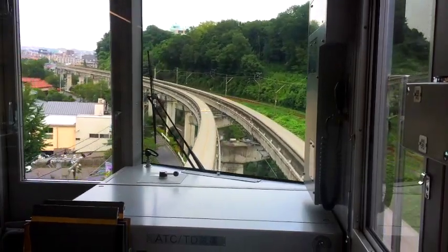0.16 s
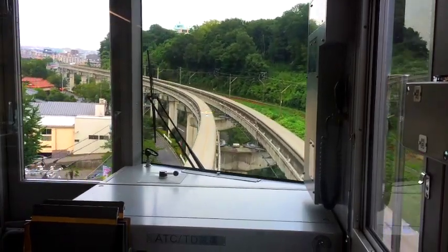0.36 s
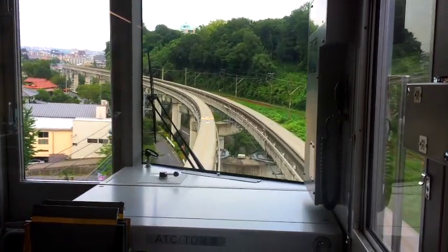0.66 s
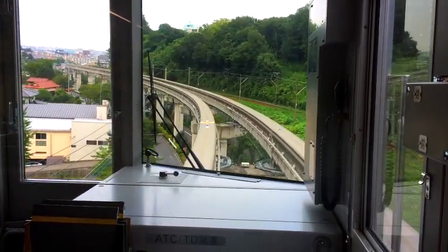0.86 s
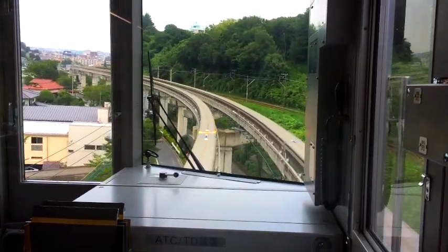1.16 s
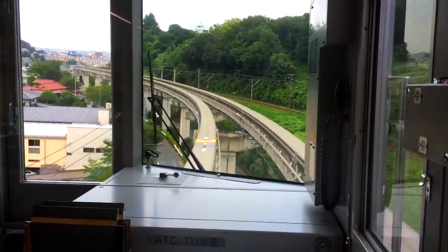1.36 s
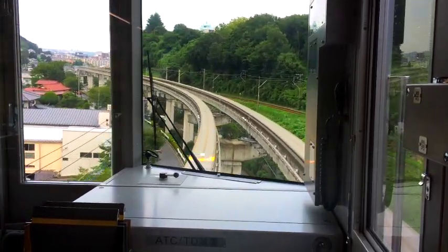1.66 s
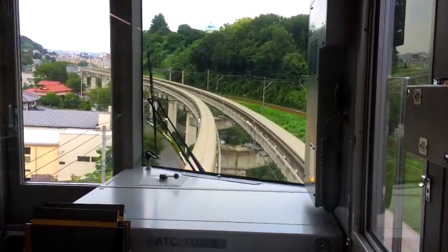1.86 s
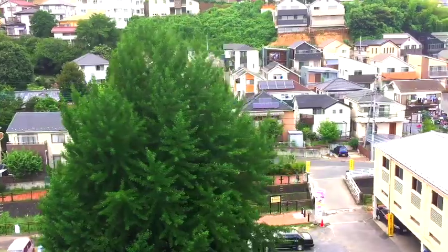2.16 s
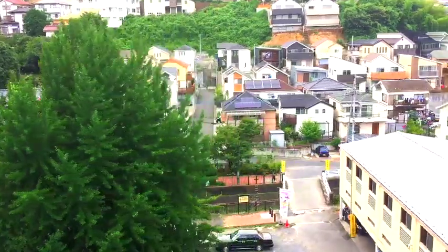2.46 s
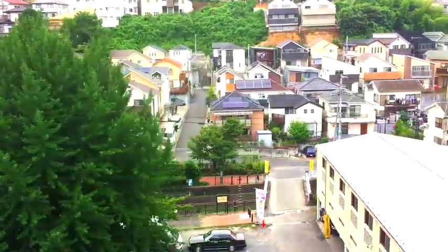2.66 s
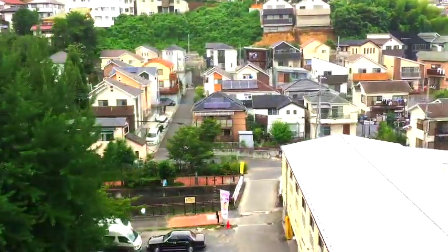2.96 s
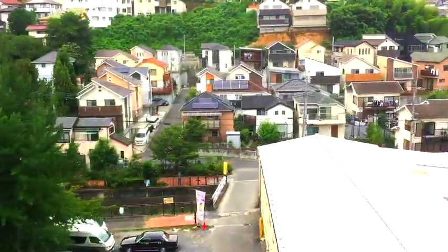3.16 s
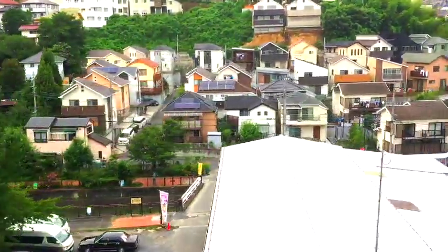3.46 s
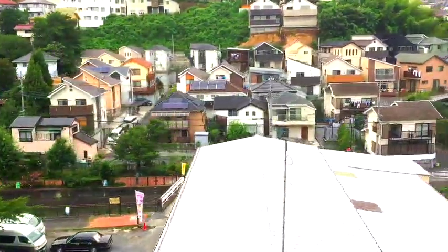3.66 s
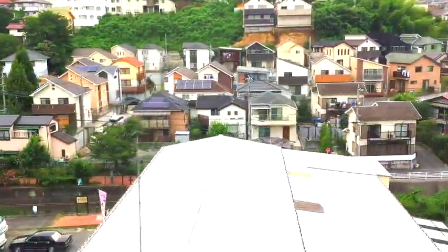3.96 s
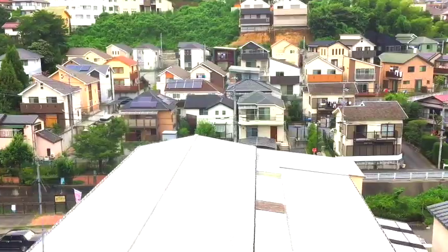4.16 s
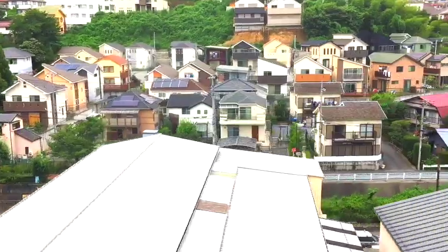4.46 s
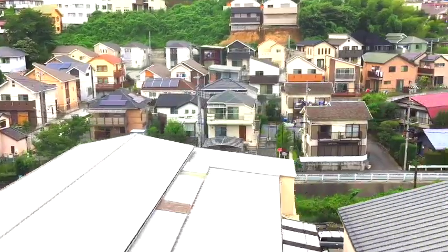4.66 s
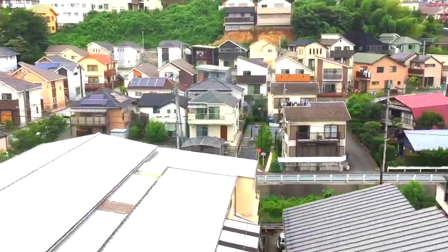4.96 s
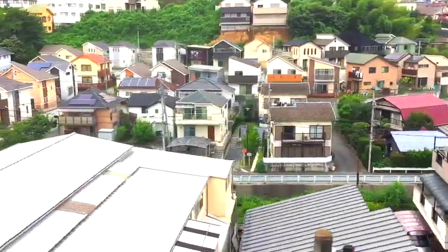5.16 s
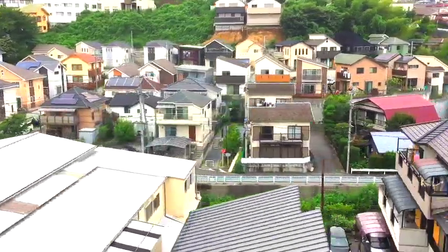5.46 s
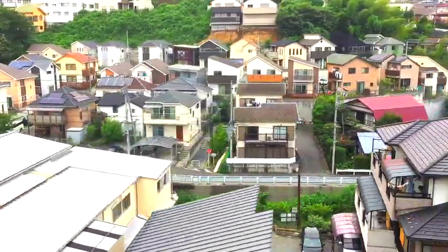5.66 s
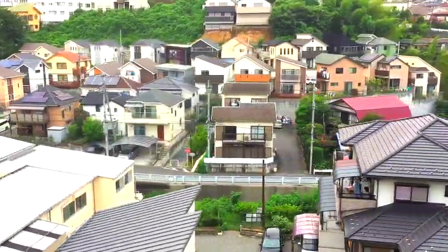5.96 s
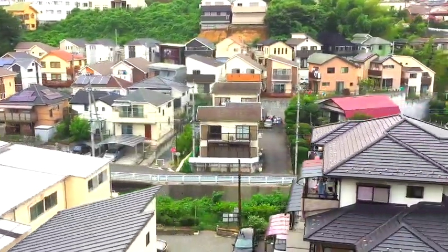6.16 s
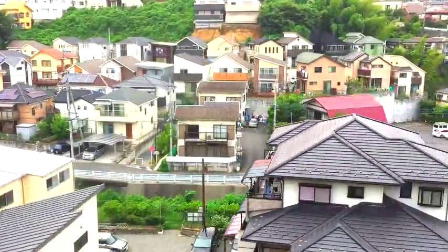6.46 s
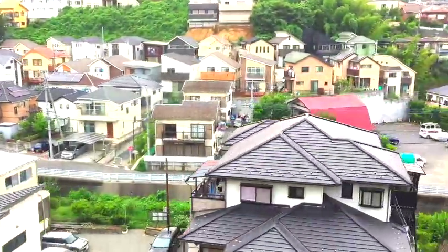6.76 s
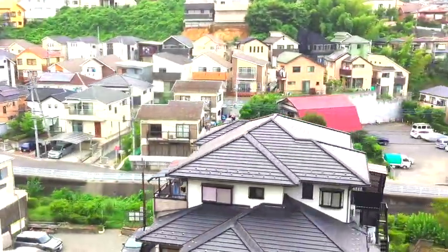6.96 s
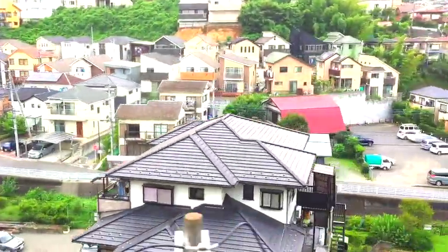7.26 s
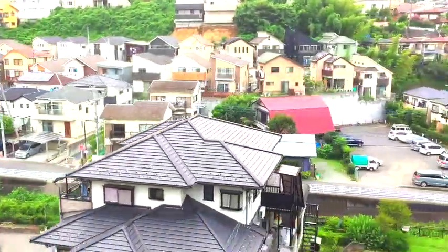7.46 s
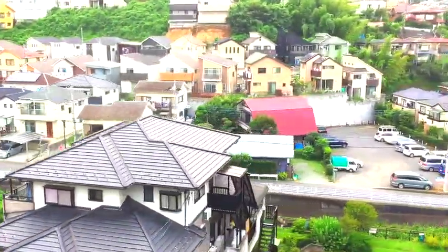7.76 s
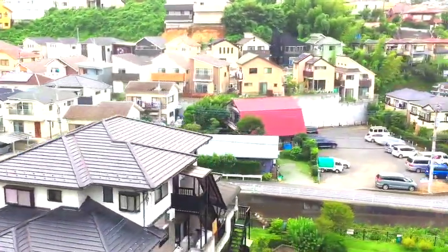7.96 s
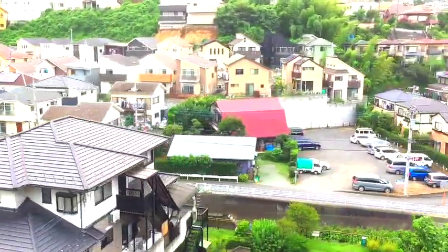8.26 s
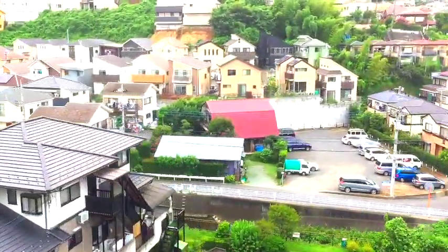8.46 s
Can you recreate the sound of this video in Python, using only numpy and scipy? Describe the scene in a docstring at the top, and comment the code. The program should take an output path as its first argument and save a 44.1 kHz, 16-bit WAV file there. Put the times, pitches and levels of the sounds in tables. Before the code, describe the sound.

Inside a monorail car running along its concrete beam, rubber tyres drum through the floor in a steady low rumble. The body booms, panels buzz and the tread hums, under a soft hiss of air and ventilation. A faint high gear whine comes and goes above it. The rumble eases slightly near the end, heard in stereo from near the window.

```python
"""A low drumming rumble fills a monorail car running on its concrete beam.
Rubber tyres drum the floor, the body booms, panels buzz, the tread hums, air and ventilation hiss.
Above them a faint gear whine drifts with the speed, its partials fading in and out.
The ride eases slightly towards the end, heard by a small stereo camera near the window."""
import sys
import numpy as np
from scipy import signal
from scipy.fft import rfft, irfft, next_fast_len
from scipy.io import wavfile
from scipy.ndimage import uniform_filter1d

SR = 44100
rng = np.random.default_rng(int(sys.argv[2]) if len(sys.argv) > 2 else 0)


def wrap_up_sound(samples):
    """Save the sound to the file named by the first command line argument, as 16-bit audio."""
    columns = np.atleast_2d(samples).T
    # keep every value between -1 and 1, then stretch to whole-number steps
    tamed = np.clip(columns, -1, 1)
    steps = np.round(tamed * 32767).astype(np.int16)
    wavfile.write(sys.argv[1], SR, steps)


N = 379701

# the swell of the ride (rush lifts boom, panels, hum and hiss together): time_s, drum_db, rush_db
RIDE_LEVELS = [(0.0, -28, 1.5), (0.7, -27.5, 2.5), (1.5, -28.5, 1.1), (2.1, -27, 0.5), (3.3, -28.5, -0.34),
               (3.8, -29.5, -0.054), (4.6, -27.5, 0.3), (6.0, -29, 0.76), (6.6, -28, -1.3), (7.05, -34, -1),
               (7.45, -28.5, -0.22), (8.61, -34.5, -1.2)]
# the rate at which gear teeth meet, following the speed: time_s, pitch_hz
MESH_PITCH = [(0.0, 2915), (0.9, 2923), (1.6, 2915), (2.2, 2903), (3.4, 2912), (5.0, 2903), (5.7, 2907),
              (6.2, 2903), (7.2, 2881), (7.5, 2880), (8.0, 2907), (8.25, 2895), (8.61, 2863)]


def undb(db):
    """Decibels as a gain."""
    return 10 ** (np.asarray(db) / 20)


def on_log(table, hz):
    """A frequency table's value columns, read at hz on a log axis."""
    table_hz, *values = np.transpose(table)
    return [np.interp(np.log(hz), np.log(table_hz), column) for column in values]


def curves(table):
    """A time table's value columns, drawn out to one value a sample."""
    time_s, *values = np.transpose(table)
    return [np.interp(np.arange(N) / SR, time_s, column) for column in values]


def walk(rate_hz):
    """A smooth random wander: held steps, slewed twice, with a spread near 1."""
    hold = int(SR / rate_hz)
    steps = np.repeat(rng.standard_normal(N // hold + 1), hold)
    return 1.47 * uniform_filter1d(uniform_filter1d(steps, hold), hold)[:N]


def cabin_noise(colour, flicker_db, rate_hz):
    """Coloured stereo noise of rms 1 filling the car; each half octave flickers on its own."""
    # the image at the two microphone ports: freq_hz, likeness (0-1), left_lead_rad, left_over_right_db
    stereo_image = [(25, 0.96, 0.4, -3.0), (60, 0.99, 0.41, -1.0), (90, 1.0, 0.34, 0.5),
                    (130, 1.0, 0.16, 1.0), (180, 0.99, 0.04, -0.5), (250, 0.94, 0.33, -1.5),
                    (340, 0.86, 0.45, 2.0), (450, 0.95, 0.14, 1.5), (570, 0.84, 0.05, -0.5),
                    (720, 0.8, 0.22, -2.0), (900, 0.74, 0.63, -0.5), (1100, 0.48, 0.57, 0.0),
                    (1400, 0.35, -0.01, 2.0), (1700, 0.47, 0.3, -0.5), (2200, 0.11, 0, -3.5),
                    (3300, 0.25, 2.11, -3.5), (4500, 0.02, 0, -0.5), (7000, 0.04, 0, -3.5),
                    (8500, 0.02, 0, 1.0), (12000, 0.04, 0, -3.0)]
    size = next_fast_len(N)
    hz = np.maximum(np.arange(size // 2 + 1) * SR / size, 1)
    shared, apart = (rfft(rng.standard_normal(size)) for _ in range(2))
    likeness, lead_rad, lean_db = on_log(stereo_image, hz)
    likeness = np.clip(likeness, 0, .999)
    side = np.array([[.5], [-.5]])
    spectrum = np.sqrt(1 + likeness) * shared + 2 * side * np.sqrt(1 - likeness) * apart
    spectrum = spectrum * undb(side * lean_db) * np.exp(1j * side * lead_rad)
    half_octaves = 2 * np.log2(hz)
    low, high = 2 * np.log2(colour[0][0]), 2 * np.log2(colour[-1][0])
    beyond = np.maximum(low - half_octaves, 0) + np.maximum(half_octaves - high, 0)
    spectrum = spectrum * undb(on_log(colour, hz)[0] - 40 * beyond)  # steep skirts outside the colour
    noise = 0
    for band in range(int(low) - 1, int(high) + 3):
        window = np.cos(np.pi / 2 * np.clip(half_octaves - band, -1, 1)) ** 2
        noise = noise + irfft(spectrum * window, size)[:, :N] * undb(flicker_db * walk(rate_hz))
    return noise / np.sqrt(np.mean(noise ** 2))


def cabin_tone(hz, flutter_db, wobble_rad, rate_hz, lean_db=0., lead_rad=0.):
    """A sine of rms near 1; moving echoes flutter its level and phase, differently at each port."""
    phase = 2 * np.pi * np.cumsum(hz) / SR + wobble_rad * walk(rate_hz)
    channels = []
    for side in (.5, -.5):
        gain = np.sqrt(2) * undb(flutter_db * walk(rate_hz) + side * lean_db)
        channels.append(gain * np.sin(phase + side * lead_rad + wobble_rad * walk(rate_hz)))
    return np.array(channels)


def body_boom(rush_db):
    """Tyres on the beam shake the whole body into a deep boom."""
    # the colour of the shaking body: freq_hz, density_db
    boom_colour = [(12, -18), (20, -11.5), (30, -7), (45, 0.5), (58, -2.5), (70, 3)]
    return undb(-41 + rush_db) * cabin_noise(boom_colour, flicker_db=0.5, rate_hz=3)


def floor_drum(level_db):
    """Rubber tyres drum the floor: the loudest layer."""
    # the colour of the drumming floor: freq_hz, density_db
    drum_colour = [(70, -12), (85, -2), (103, -0.5), (118, -1), (135, -0.5), (155, -1.5), (175, -2.5),
                   (210, -9), (250, -15.5), (300, -28.5)]
    return undb(level_db) * cabin_noise(drum_colour, flicker_db=0.68, rate_hz=14)


def tread_hum(rush_db):
    """The tread rolling on concrete hums in the low mids."""
    # the colour of the rolling tread: freq_hz, density_db
    hum_colour = [(355, -11), (380, -3.5), (410, -1), (455, 1), (490, -0.1), (530, -6), (590, -10.5),
                  (700, -11.5), (750, -13.5), (820, -12), (880, -15), (950, -16), (1080, -20), (1200, -25)]
    return undb(-43.5 + rush_db) * cabin_noise(hum_colour, flicker_db=0.32, rate_hz=2.9)


def air_hiss(rush_db):
    """Passing air and ventilation lay a soft hiss on top."""
    # the colour of the moving air: freq_hz, density_db
    hiss_colour = [(1200, -0.5), (1350, -0.5), (1520, 0.5), (1640, -1), (1750, -1), (3000, -10.5),
                   (3750, -19.5), (4250, -17), (4800, -17), (6100, -17.5), (7700, -24.5), (8700, -23.5),
                   (10300, -25.5), (12500, -34), (14500, -35), (15600, -42.5)]
    return undb(-57.5 + rush_db) * cabin_noise(hiss_colour, flicker_db=0.6, rate_hz=8)


def panel_buzz(rush_db):
    """Wall panels and window buzz just above the pitch of the drumming."""
    # the colour of the shaken panels: freq_hz, density_db
    buzz_colour = [(190, -11.5), (225, -1), (250, -1.5), (300, -3.5), (355, -9)]
    return undb(-42 + rush_db) * cabin_noise(buzz_colour, flicker_db=1.0, rate_hz=2)


def gear_whine(mesh_hz):
    """Meshing teeth whine, steadier as they get louder, with a rough flank just below."""
    # the whine fading in and out: time_s, level_db
    whine_fades = [(0, -75), (0.12, -71), (0.39, -78), (0.44, -66), (0.56, -68), (0.64, -75), (0.75, -72),
                   (0.92, -79), (1.2, -75), (1.35, -77), (1.44, -72), (1.83, -79), (2.17, -69), (2.36, -73),
                   (2.52, -69), (2.66, -71), (2.78, -78), (3.15, -73), (3.25, -78), (3.37, -73),
                   (3.65, -74), (4.02, -77), (4.22, -69), (4.35, -67), (4.43, -77), (4.82, -76),
                   (4.88, -72), (4.95, -77), (5.28, -76), (5.37, -72), (5.52, -77), (5.6, -66), (5.72, -68),
                   (5.82, -72), (6.14, -70), (6.3, -76), (6.56, -69), (6.66, -74), (6.76, -73), (6.82, -68),
                   (6.92, -70), (7.08, -74), (7.17, -67), (7.29, -75), (7.56, -78), (7.77, -68), (7.9, -75),
                   (8.07, -78), (8.16, -74), (8.45, -72), (8.61, -74)]
    level_db, = curves(whine_fades)
    shake = np.interp(level_db, [-75, -68], [1, .35])
    whine = cabin_tone(mesh_hz, flutter_db=3.5 * shake, wobble_rad=.6 * shake, rate_hz=45,
                       lean_db=-4, lead_rad=1.6)
    flank = cabin_tone(mesh_hz - 25, flutter_db=4, wobble_rad=1.5, rate_hz=90, lean_db=-3)
    return undb(level_db) * (whine + undb(-8) * flank)


def whine_octave(mesh_hz):
    """The mesh's second harmonic swells and steadies at its own moments, also with a rough flank."""
    # the octave fading in and out: time_s, level_db
    octave_fades = [(0, -83), (0.27, -77), (0.48, -88), (0.72, -75), (0.86, -78), (1.2, -86), (1.32, -80),
                    (1.53, -84), (1.63, -78), (1.83, -85), (2.16, -78), (2.46, -86), (2.76, -80),
                    (2.89, -92), (3.03, -80), (3.36, -92), (3.68, -79), (3.88, -75), (4.06, -89),
                    (4.2, -79), (4.44, -78), (4.55, -83), (4.72, -78), (4.86, -90), (4.98, -77),
                    (5.25, -92), (5.49, -83), (5.61, -85), (5.74, -74), (5.82, -75), (5.91, -82),
                    (6.03, -75), (6.18, -84), (6.33, -78), (6.42, -89), (6.54, -78), (6.65, -85),
                    (7.13, -78), (7.29, -90), (7.59, -83), (7.68, -88), (7.85, -81), (8.2, -84), (8.3, -91),
                    (8.61, -90)]
    level_db, = curves(octave_fades)
    shake = np.interp(level_db, [-82, -75], [1, .5])
    octave = cabin_tone(2 * mesh_hz, flutter_db=4.5 * shake, wobble_rad=.7 * shake, rate_hz=45,
                        lean_db=-2.5, lead_rad=-.7)
    flank = cabin_tone(2 * mesh_hz - 45, flutter_db=3.5, wobble_rad=1.5, rate_hz=150, lean_db=-2.5)
    return undb(level_db) * (octave + undb(-3) * flank)


def second_gear_pair(mesh_hz):
    """A second gear pair sings a thin tone, and its sum with the mesh whine rings faintly above; both follow
    the same speed."""
    # the pair's tone and its sum tone with the mesh: mesh_multiple
    pair_orders = [1.4809, 2.4815]
    # the lower tone fading in and out: time_s, level_db
    lower_fades = [(0.0, -92), (0.5, -87), (1.3, -90), (1.7, -94), (2.45, -89), (3.6, -94), (4.05, -83),
                   (4.4, -82), (4.55, -88), (4.75, -81), (5.1, -82), (5.4, -94), (5.8, -92), (6.0, -84),
                   (6.6, -88), (7.0, -86), (7.5, -87), (7.8, -92), (8.61, -94)]
    lower_db, = curves(lower_fades)
    upper_db = -95 + 3 * walk(2)
    return sum(undb(db) * cabin_tone(order * mesh_hz, flutter_db=1.5, wobble_rad=.25, rate_hz=8,
                                     lead_rad=lead)
               for order, db, lead in zip(pair_orders, (lower_db, upper_db), (-1.7, 1.7)))


def faint_partials(mesh_hz):
    """Two weak partials of the drive come and go at random."""
    # their pitches: mesh_multiple
    partial_orders = [1.4104, 3]
    # the levels they wander around: level_db
    partial_levels = [-97, -101]
    return sum(undb(db + 2.5 * walk(2.5))
               * cabin_tone(order * mesh_hz, flutter_db=2.2, wobble_rad=.4, rate_hz=15)
               for order, db in zip(partial_orders, partial_levels))


def rough_ring(mesh_hz):
    """A grainy ring in the running noise tracks the mesh from below."""
    # the ring's slow swells: time_s, level_db
    ring_swells = [(0, -69), (0.7, -70), (1.5, -75.5), (3.5, -74.5), (4.5, -76.5), (5.5, -77), (6.2, -69),
                   (7.0, -70), (7.9, -69), (8.61, -74)]
    level_db, = curves(ring_swells)
    return undb(level_db) * cabin_tone(.566 * mesh_hz, flutter_db=4, wobble_rad=1.2, rate_hz=85)


def scene():
    """A bed of rolling noise with the drive singing faintly over it, all running from the start."""
    drum_db, rush_db = curves(RIDE_LEVELS)
    mesh_hz, = curves(MESH_PITCH)
    rumble = body_boom(rush_db) + floor_drum(drum_db)
    rush = tread_hum(rush_db) + air_hiss(rush_db) + panel_buzz(rush_db)
    gears = gear_whine(mesh_hz) + whine_octave(mesh_hz) + second_gear_pair(mesh_hz)
    return rumble + rush + gears + faint_partials(mesh_hz) + rough_ring(mesh_hz)


def record(dry):
    """The camera rounds the loudest swings and cuts the extreme treble."""
    top_hz = 15700
    lowpass = signal.ellip(10, .2, 70, top_hz, fs=SR, output="sos")
    rounded = np.tanh(3.007 * dry) / 2.993
    settled = signal.sosfilt_zi(lowpass)[:, None] * rounded[None, :, :1]  # the filter starts settled
    return signal.sosfilt(lowpass, rounded, zi=settled)[0]


dry = scene()
out = record(dry)
wrap_up_sound(out)
```